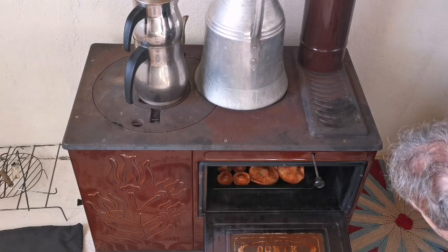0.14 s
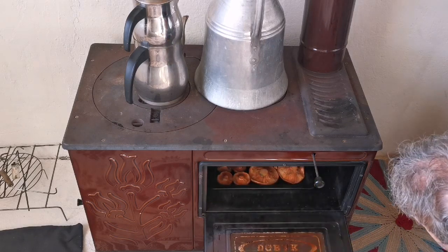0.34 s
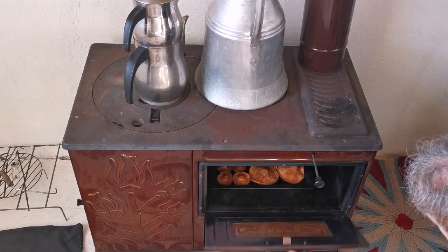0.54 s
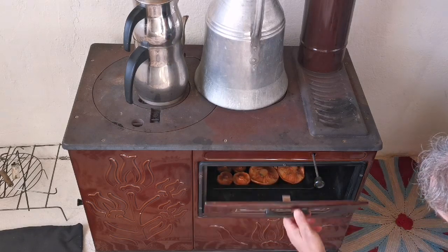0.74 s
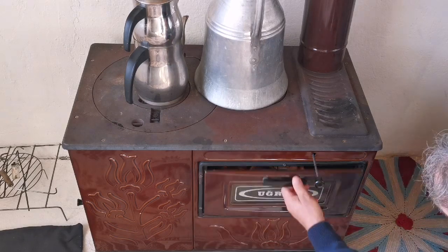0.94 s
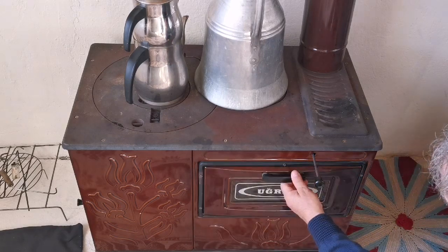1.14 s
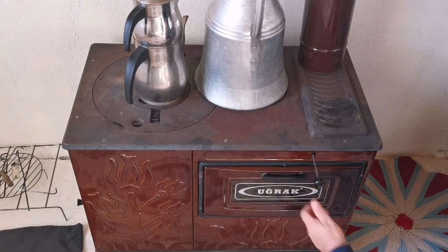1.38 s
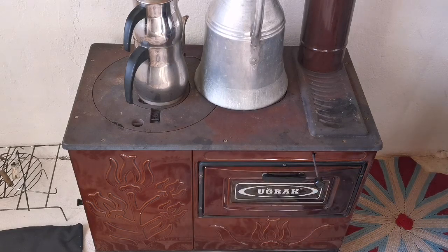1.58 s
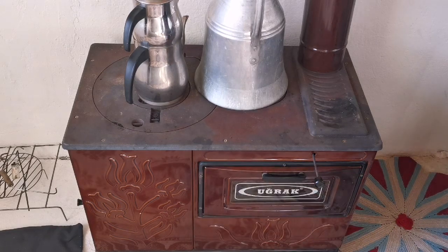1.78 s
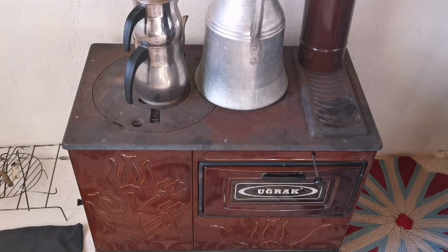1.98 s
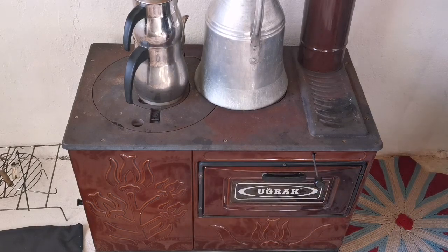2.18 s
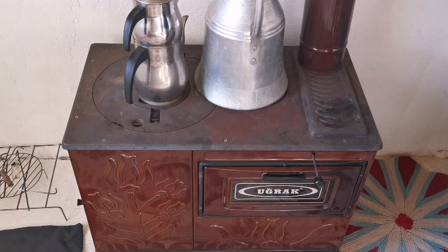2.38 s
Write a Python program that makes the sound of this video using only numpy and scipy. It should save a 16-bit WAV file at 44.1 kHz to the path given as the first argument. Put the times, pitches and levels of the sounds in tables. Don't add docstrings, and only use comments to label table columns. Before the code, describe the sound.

A sheet-metal stove oven door slams shut with a sharp clack, hollow boom and brief rattle

```python
import sys
import numpy as np
from scipy import signal
from scipy.fft import rfft, irfft, next_fast_len
from scipy.io import wavfile

SR = 44100
rng = np.random.default_rng(int(sys.argv[2]) if len(sys.argv) > 2 else 0)


def gain_from_db(level_db):
    decades = np.asarray(level_db, float) / 20
    return 10 ** decades


def to_wav(sig):
    pcm = np.clip(np.atleast_2d(sig), -1, 1) * 32767
    pcm = np.round(pcm).astype(np.int16)
    wavfile.write(sys.argv[1], SR, pcm.T)


N = 106457

# pitch_hz, level_db [dB per Hz]
HUM_COLOUR = [(25, 1.5), (60, -6), (110, 2), (250, -3), (350, -9), (520, -10.5), (1000, -19), (7000, -31.5)]
# time_s, level_db
HUM_EBB = [
    (0, 7.5),
    (0.999, -0.5),
    (2.099, 2.5),
    (2.41, -8.5),
]
# start_s, level_db, length_s, softest_hz, brightest_hz
FOOTFALLS = [(0, -61.5, 0.0031, 78, 583), (.03, -64, 0.035, 81.4, 474), (.1, -63.5, 0.12, 216, 700),
             (.19, -67, 0.048, 145, 646), (.29, -58, 0.097, 79, 2310), (.33, -62.5, 0.043, 120, 290),
             (.41, -58.5, 0.09, 490, 3260), (.45, -67.5, 0.06, 61, 644), (.585, -72.5, 0.01, 99, 403),
             (0.623, -80, .04, 101, 285), (.66, -80, 0.012, 102, 397), (1.29, -48.5, 0.091, 62, 222),
             (1.5, -55, 0.15, 57.4, 670), (1.6, -64, 0.086, 202, 333), (1.779, -62, 0.058, 154, 760),
             (1.86, -69.5, 0.026, 185, 305), (2.03, -82.5, 0.098, 150, 496),
             (2.327, -63.5, 0.11, 1226, 3650)]
# pitch_hz, level_db [dB per Hz]
FLOOR_COLOUR = [(40, 3), (64, 3.5), (250, -2), (330, -6.5), (700, -15.5), (1200, -20), (2600, -25),
                (6500, -29.5)]
# pitch_hz, t60_s
DENSE_T60 = [(50, 1), (130, 0.94), (350, 1), (920, 0.34), (2430, 0.32), (6400, 0.23), (14000, 0.31)]
# start_s, rise_s, hold_s, fall_s, level_db
RUSTLE_STROKES = [
    (0.297, 0.0044, 0.02, 0.049, -68.5),
    (0.341, 0.00093, 0.017, 0.088, -56),
    (0.383, 0.028, 0.04, 0.099, -59),
    (0.585, 0.12, 0.051, 0.09, -69.5),
    (1.272, .003, 0.045, 0.074, -58.5),
    (1.355, 0.0027, 0.013, 0.18, -66.5),
    (1.608, 0.11, 0.014, 0.12, -67.5),
    (1.734, 0.04, 0.022, 0.36, -56.5),
    (1.855, 0.12, 0.048, 0.28, -64),
    (2.19, 0.16, 0.092, 0.084, -62.5),
]
# pitch_hz, level_db [dB per Hz]
RUSTLE_COLOUR = [(300, -26), (700, -20.5), (1300, -4), (3250, -10), (5000, -11.5), (7000, -3.5), (9000, -8)]
# start_s, level_db
LID_SHAKES = [
    (.7, -102),
    (1.265, -81),
    (1.37, -82),
    (1.5, -95),
]
# pitch_hz, level_db, t60_s
LID_MODES = [(1050, 0, .16), (1072, -3, .12)]
CONTACT_S = [1.0415, 1.0543, 1.057, 1.0702, 1.0772, 1.087, 1.1, 1.17, 1.28, 1.3, 1.3705, 1.3774, 1.47]
# level_db, length_s, softest_hz, brightest_hz
CONTACTS = [(-39.5, 0.013, 160, 6000), (-11.5, .011, 1200, 13000), (-26.5, 0.011, 430, 13000),
            (-0.5, 0.0052, 676, 11000), (-3.5, 0.0045, 116, 18600), (-9, 0.006, 54, 8400),
            (-22, 0.014, 120, 5900), (-28, 0.07, 60, 1400), (-34.5, 0.0094, 2100, 3100),
            (-33.5, 0.015, 140, 2220), (-45.5, 0.0059, 730, 4000), (-40.5, 0.0082, 510, 2600),
            (-46.5, 0.067, 440, 2500)]
# pitch_hz, level_db [dB per Hz]
PLATE_COLOUR = [(40, -7.5), (70, 2.5), (200, -8.5), (330, -7), (700, -8), (1250, -11), (2600, -19.5),
                (6500, -22)]
# pitch_hz, level_db, t60_s
DOOR_MODES = [(412, -12.5, 0.46), (883, -14, .2), (1092, -3.5, .1), (1321, -4, 0.17), (1419, -7, 0.14),
              (1911, -10.5, .14), (2217, -8, 0.18), (2470, -14, 0.1), (2930, -18, .12), (4570, -18, 0.082),
              (4750, -17, 0.12), (5710, -19, .1)]
# pitch_hz, level_db, t60_s
BODY_MODES = [(82, -2.5, 0.64), (110.4, 0.5, 0.67), (147.1, -5, 0.88), (162.7, 3, 0.32),
              (170.7, -10.5, 1.9), (241.6, -7, 1.3), (253.7, -5, 1.62), (263, -5.5, 0.65),
              (287.7, -8, 0.47), (332.5, -8.5, 0.55), (490, -13, .8), (519.7, -14.5, 1.2)]
# pitch_hz, level_db, t60_s, swell_s (only where a mode fills slowly)
THUD_MODES = [(76, -18, .16), (80, -23, 0.24), (109, -28, 0.28), (140, -28, 0.15), (162, -26.5, 0.6),
              (284.5, -24.5, 0.46, -1.2), (254.5, -36, 1.66, -0.6), (406, -38, 0.88), (518, -35, 0.44),
              (598, -33, 0.45), (739, -39.5, .25), (1100, -30, 0.19), (1163, -18, 0.1632, -0.75),
              (1220, -22.5, 0.02, -1.6)]
# pitch_hz, side_minus_mid_db
WIDTH = [(60, -27), (250, -21), (500, -18), (1000, -15), (1500, -12), (2200, -4.5), (4000, -2.5),
         (10000, -1.5)]
# pitch_hz, level_db
MIC = [(7700, -0.5), (8300, -13), (12000, -15.5), (16000, -21)]

HUM_DB, PLATE_DB, DOOR_DB, BODY_DB = -62, -34, -22.5, -28
THUD_S = 1.064
RISE_CYCLES = 0.79
CHATTER_PER_S, CHATTER_SPREAD_DB = 2300, 2.5
RUB_S = 0.012
WAVER_DB, WAVER_PER_S, WAVER_RAD = 3.5, 12, 0.8
FLOOR_CRACK_DB, FLOOR_CRACK_S = 17, 0.0014
PLATE_CRACK_DB, PLATE_CRACK_S = 5, 0.003
STEP_DULL_DB, STEP_DULL_T60_S = 37.5, 0.21
STEP_T60_SHARE = 0.17
MIC_TOP_HZ = 16300


def at_hz(points, hz):
    table = np.array(points)
    return np.interp(np.log(np.maximum(hz, 1)), np.log(table[:, 0]), table[:, 1])


def rms_one(x):
    return x / np.sqrt(np.mean(x ** 2) + 1e-20)


def drift(rate):
    r = np.exp(-80 * np.pi * rate / SR)
    slow = signal.lfilter([1], [1, -2 * r, r * r], rng.standard_normal(N // 40 + 2002))[2000:]
    return np.interp(np.arange(N) / 40, np.arange(len(slow)), rms_one(slow))


def band_filter(x, low_hz, high_hz):
    return signal.sosfilt(signal.butter(2, [low_hz, high_hz], "band", fs=SR, output="sos"), x)


def banded_noise(gain_db):
    out, edges = 0, 25 * 2 ** (np.arange(30) / 3)
    white = rng.standard_normal((2, 2, N))
    for k, (low, high) in enumerate(zip(edges, edges[1:])):
        mid, side = band_filter(white[k % 2], low, high)
        hz = np.sqrt(low * high)
        out = out + gain_from_db(gain_db(hz)) * (mid + gain_from_db(at_hz(WIDTH, hz)) * side * [[1], [-1]])
    return rms_one(out)


def patchy(colour, patchy_db, rate):
    together, own = drift(rate), drift(rate)
    return banded_noise(lambda hz: at_hz(colour, hz) + patchy_db * (together + np.roll(own, int(hz * 7))))


def modes(rows):
    out = np.zeros((2, 2 * SR))
    phases = rng.uniform(-0.6, 1, (len(rows), 2))
    for (hz, db, t60, *slow), (start, part) in zip(rows, phases):
        t = np.arange(int(min(t60 * 1.3, 2) * SR)) / SR
        lag = np.arctan(gain_from_db(at_hz(WIDTH, hz))) * part * np.array([[1], [-1]])
        swell = 1 - np.exp(-(t / slow[0]) ** 2 if slow else -t * hz / RISE_CYCLES)
        waver = gain_from_db(WAVER_DB * np.minimum(t / 0.041, 1) * drift(WAVER_PER_S)[:len(t)])
        wander = WAVER_RAD * np.minimum(t / 0.1, 1) * drift(WAVER_PER_S)[:len(t)]
        ring = np.sin(2 * np.pi * hz * t + np.pi * start + wander + lag)
        out[:, :len(t)] += swell * waver * gain_from_db(db - 60 * t / t60) * ring
    return out


def chatter(start_s, db, length, low_hz, high_hz):
    t = np.arange(SR // 4) / SR
    chance, size, sign = rng.random((3, len(t)))
    ticks = (chance < CHATTER_PER_S / SR) * gain_from_db(-CHATTER_SPREAD_DB * np.log(size + 0.01)) * np.sign(sign - 0.5)
    ticks[0] = 3
    rub_in = 1 if length < RUB_S else np.minimum(2 * t / length, 1)
    burst = ticks * np.exp(-(t / length) ** 2) * rub_in
    burst = band_filter(burst + 1e-18, low_hz, min(high_hz, 0.45 * SR))
    out, at = np.zeros(N + SR), int(max(start_s, 0) * SR)
    out[at:at + len(t)] = gain_from_db(db) * burst / np.sqrt(np.sum(burst ** 2))
    return out[:N]


def knocks(rows, body):
    force = sum(chatter(*row) for row in rows)
    return signal.fftconvolve(force[None], body, axes=1)[:, :N]


def hum():
    tone = gain_from_db(HUM_DB) * patchy(HUM_COLOUR, patchy_db=0.5, rate=16.0)
    low = signal.sosfiltfilt(signal.butter(2, 900, fs=SR, output="sos"), tone)
    ebb_db = np.interp(np.arange(N) / SR, *np.transpose(HUM_EBB))
    return tone + low * (gain_from_db(ebb_db) - 1)


def dense_floor():
    t = (np.arange(N) + 1) / SR

    def level_db(hz):
        t60 = at_hz(DENSE_T60, hz)
        decay = -10 * np.log10(t60) - 60 * t / t60
        swell = 20 * np.log10(1 - np.exp(-t * hz / RISE_CYCLES))
        return at_hz(FLOOR_COLOUR, hz) + decay + swell + FLOOR_CRACK_DB * np.exp(-t / FLOOR_CRACK_S)
    return banded_noise(level_db)[:, :2 * SR] / np.sqrt(N)


def steps():
    low = modes([(hz, db, t60 * STEP_T60_SHARE) for hz, db, t60 in BODY_MODES])
    t = np.arange(2 * SR) / SR
    dull = dense_floor() * gain_from_db(STEP_DULL_DB - 60 * t / STEP_DULL_T60_S)
    return knocks(FOOTFALLS, low + dull)


def rustle():
    t = np.arange(N) / SR
    strokes = 0
    for start, rise, hold, fall, db in RUSTLE_STROKES:
        rising = np.clip((t - start) / rise, 0, 1)
        falling = gain_from_db(-20 * np.clip((t - start - rise - hold) / fall, 0, 9))
        strokes = strokes + gain_from_db(db) * rising * falling
    return strokes * patchy(RUSTLE_COLOUR, patchy_db=1.0, rate=8.2)


def lid():
    return knocks([(s, db + 20, 0.04, 500, 2000) for s, db in LID_SHAKES], modes(LID_MODES))


def plates(rows):
    force = np.array([chatter(*row) ** 2 for row in rows])
    low, high = np.array(rows)[:, 3:].T

    def level_db(hz):
        reach = 1 / (1 + (low / hz) ** 4) / (1 + (hz / high) ** 4) / (high - low)
        fed = reach @ force
        keep = gain_from_db(-120 / SR / at_hz(DENSE_T60, hz))
        crack = np.exp(-1 / SR / PLATE_CRACK_S)
        rise = np.exp(-hz / SR / RISE_CYCLES)
        held = signal.lfilter([1], [1, -keep], fed)
        held = held + gain_from_db(2 * PLATE_CRACK_DB) * signal.lfilter([1], [1, -crack], fed)
        energy = (1 - keep) * signal.lfilter([1 - rise], [1, -rise], held)
        return at_hz(PLATE_COLOUR, hz) + 10 * np.log10(energy + 1e-30)
    return gain_from_db(PLATE_DB) * banded_noise(level_db)


def thud():
    return np.pad(modes(THUD_MODES), ((0, 0), (int(THUD_S * SR), 0)))[:, :N]


def stove():
    rows = [(s, *row) for s, row in zip(CONTACT_S, CONTACTS)]
    body = gain_from_db(DOOR_DB) * modes(DOOR_MODES) + gain_from_db(BODY_DB) * modes(BODY_MODES)
    return plates(rows) + knocks(rows, body) + thud()


def scene():
    return (hum() + steps() + rustle() + lid() + stove()) * np.array([[gain_from_db(0.4)], [gain_from_db(-0.4)]])


def band_limit(x):
    return signal.sosfilt(signal.butter(12, 16490, fs=SR, output="sos"), x)


def record(dry):
    size = next_fast_len(N + 4096)
    hz = np.arange(size // 2 + 1) * SR / size
    response = gain_from_db(at_hz(MIC, hz)) * (hz < MIC_TOP_HZ)
    heard = irfft(rfft(dry, size) * response, size)[:, :N]
    return band_limit(heard)


dry = scene()
out = record(dry)
to_wav(out)
```